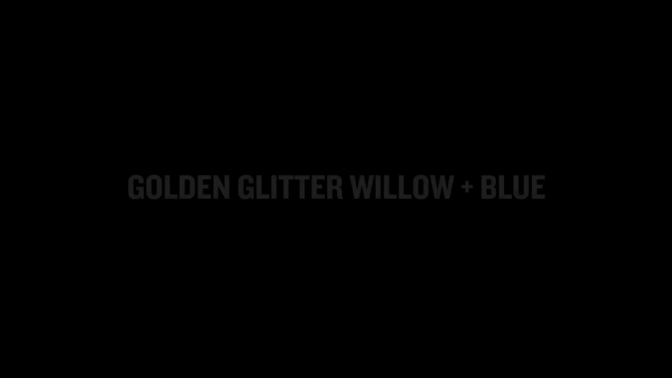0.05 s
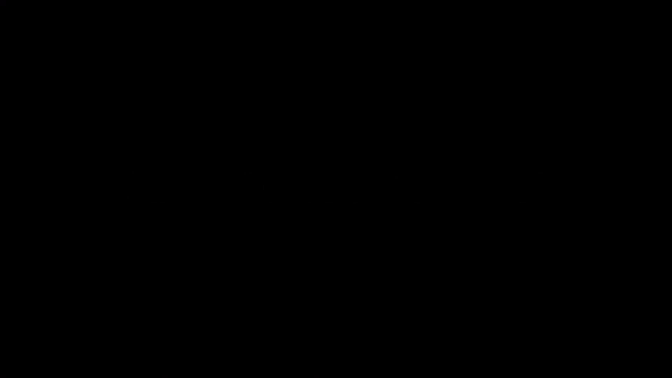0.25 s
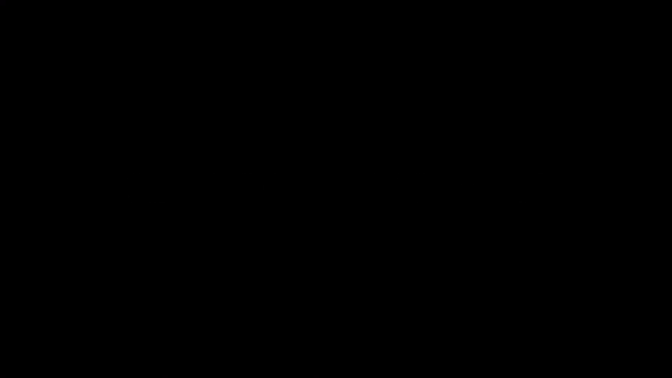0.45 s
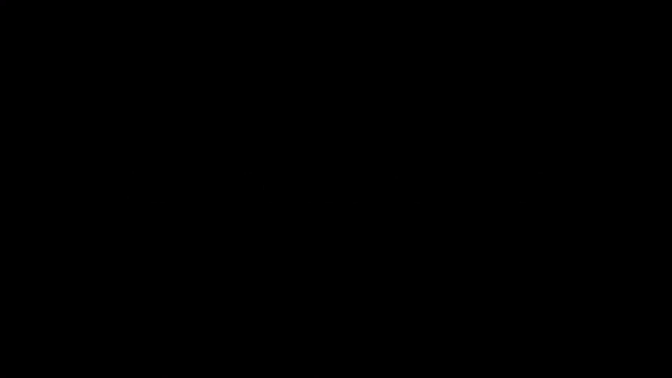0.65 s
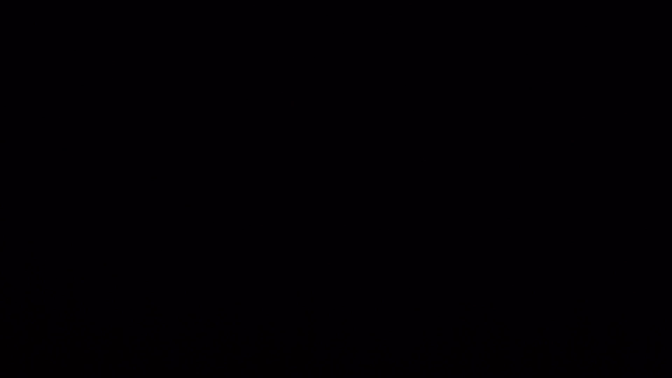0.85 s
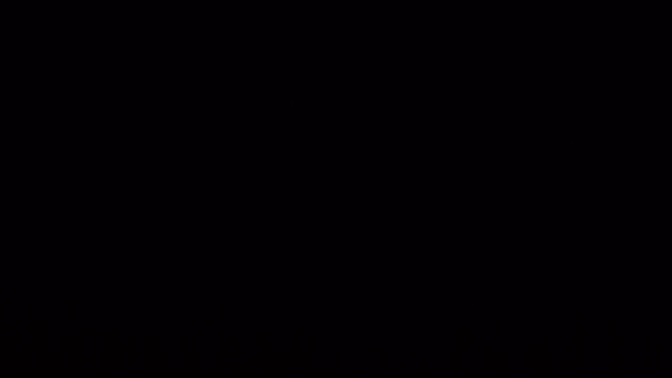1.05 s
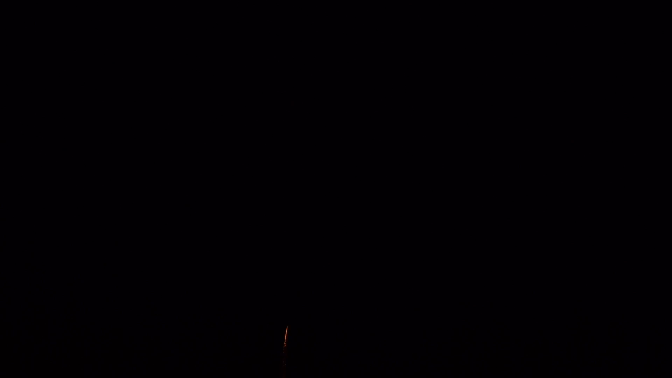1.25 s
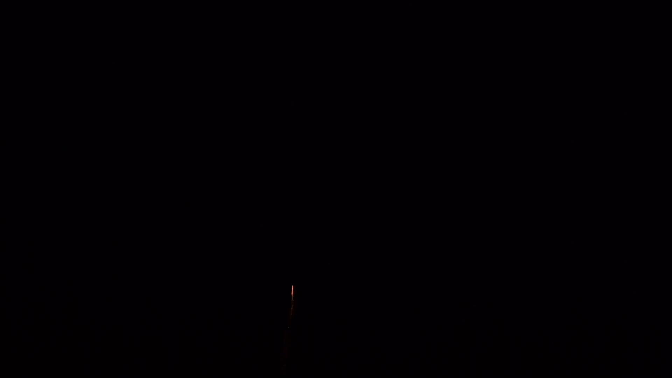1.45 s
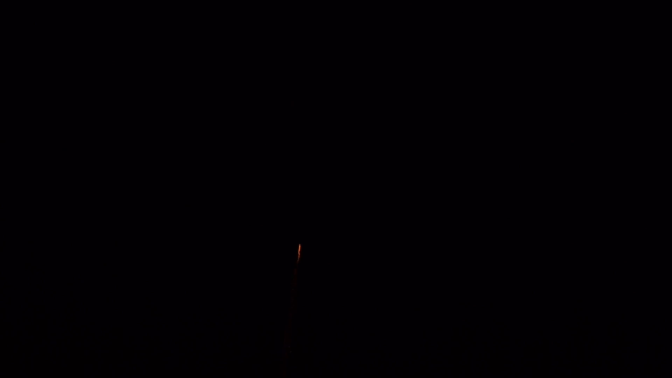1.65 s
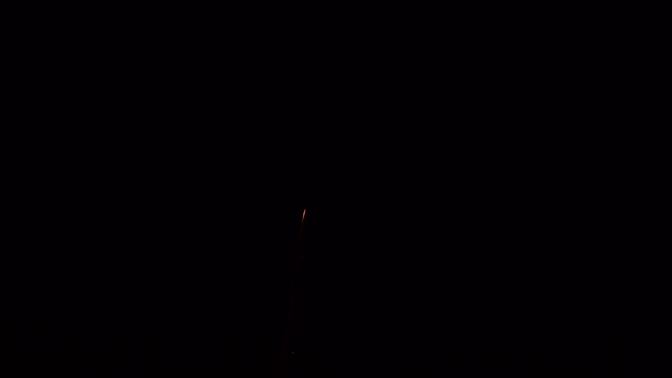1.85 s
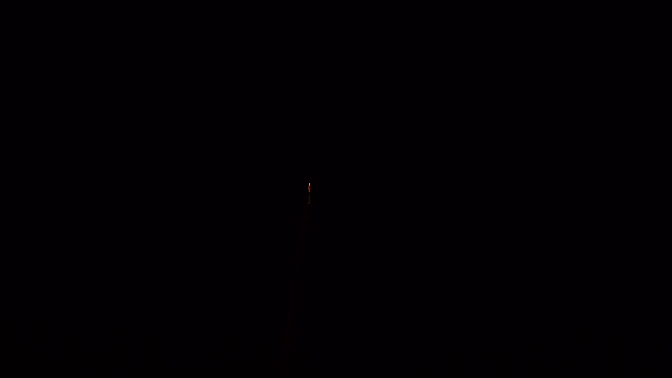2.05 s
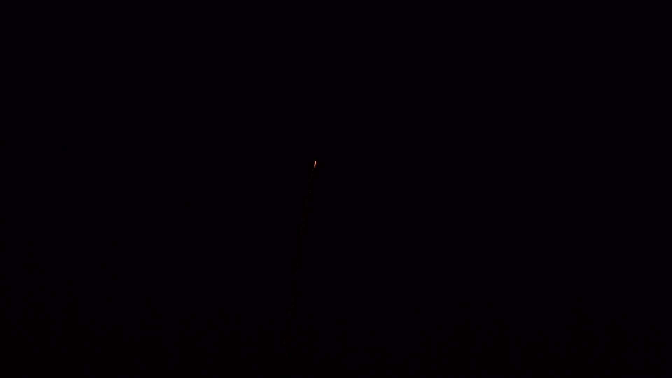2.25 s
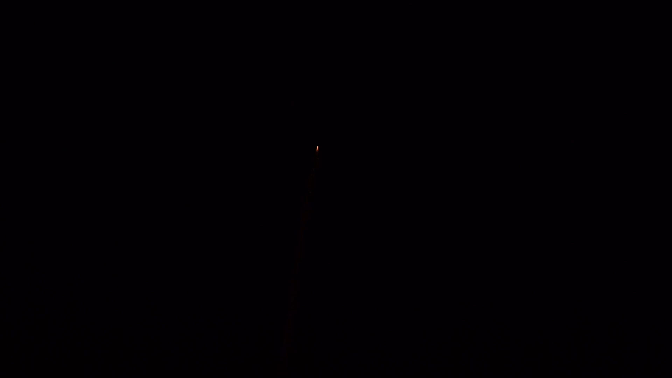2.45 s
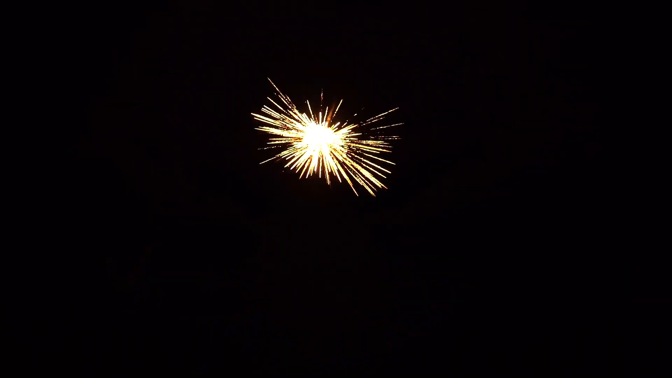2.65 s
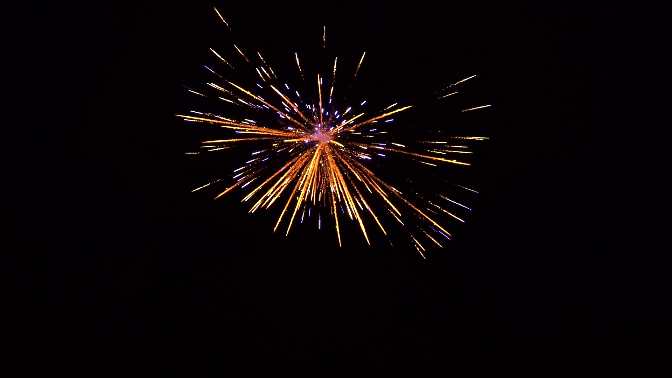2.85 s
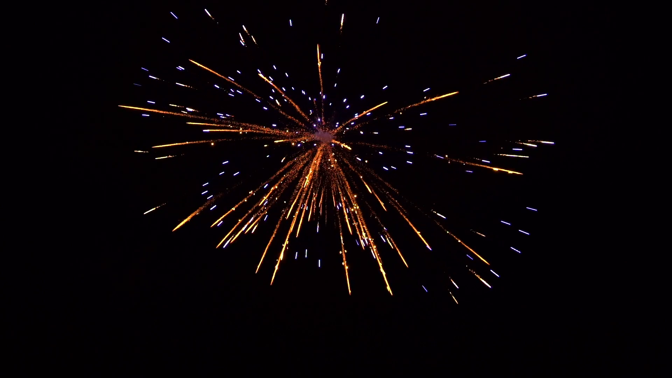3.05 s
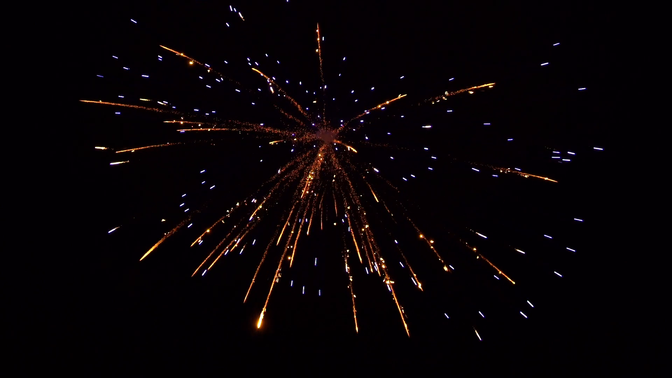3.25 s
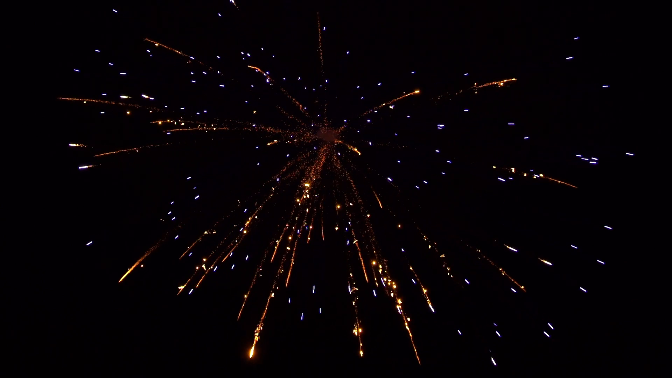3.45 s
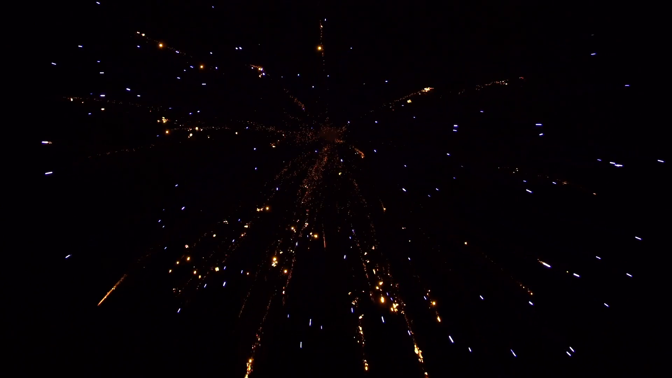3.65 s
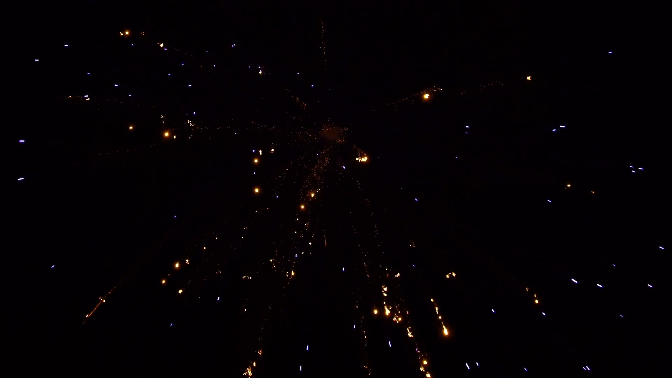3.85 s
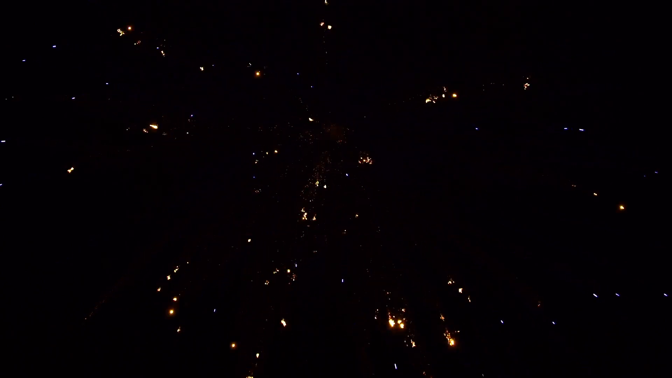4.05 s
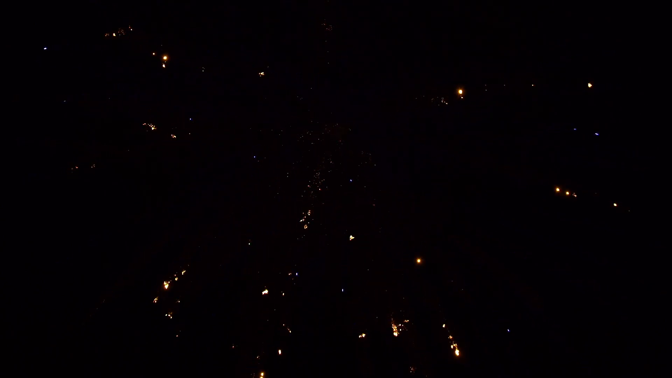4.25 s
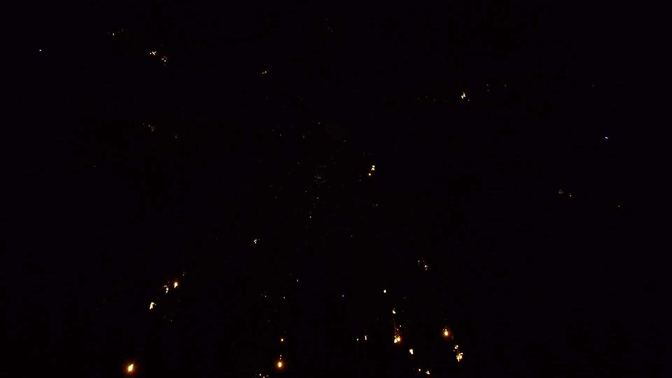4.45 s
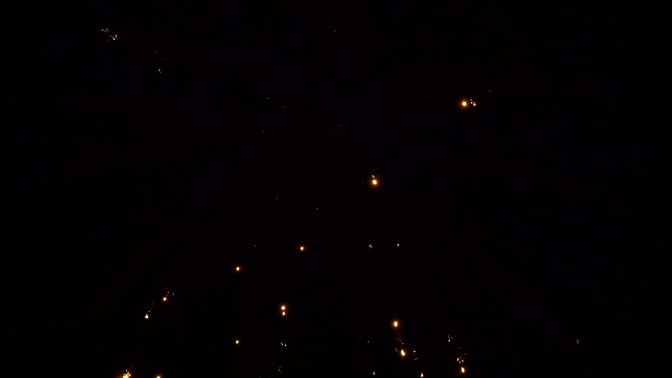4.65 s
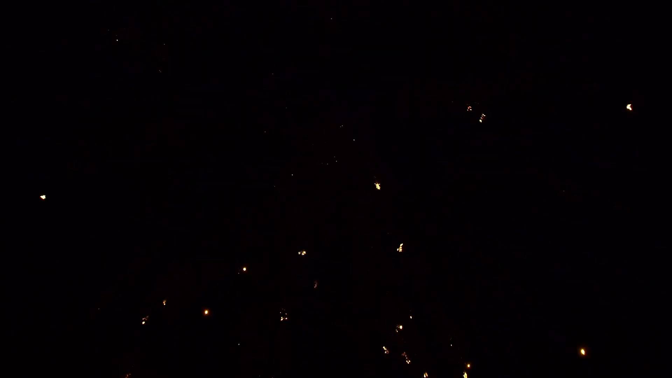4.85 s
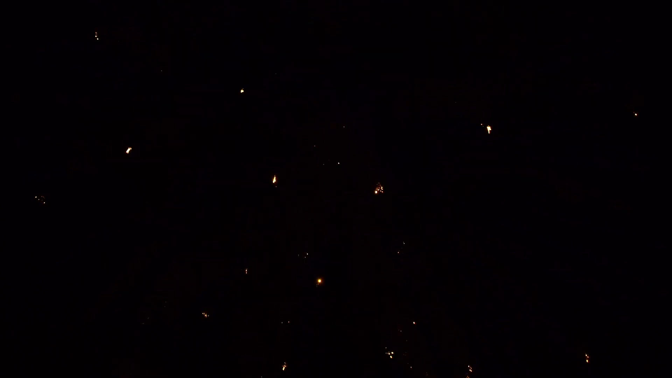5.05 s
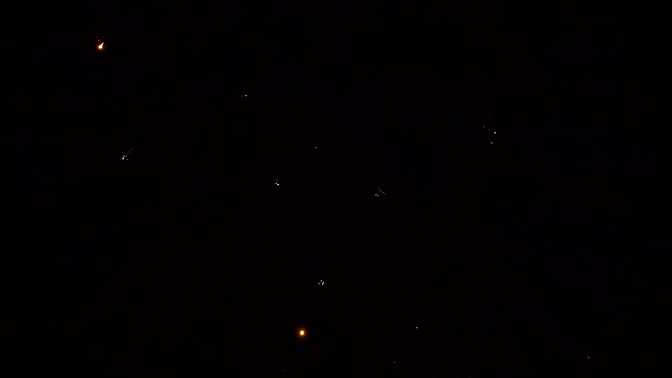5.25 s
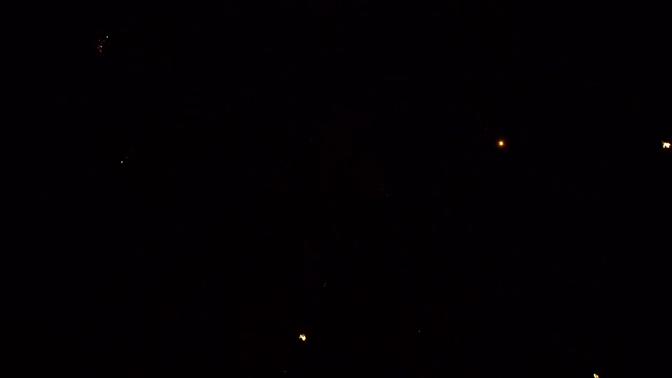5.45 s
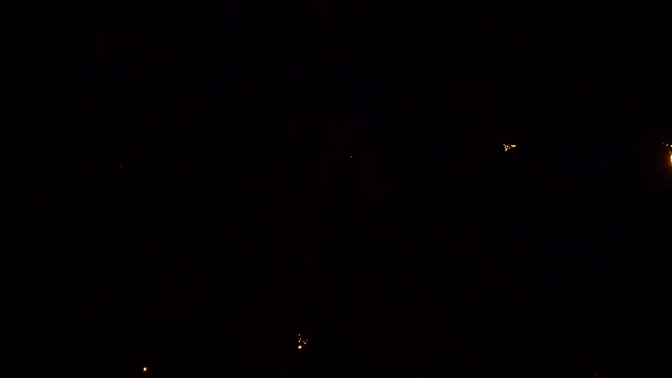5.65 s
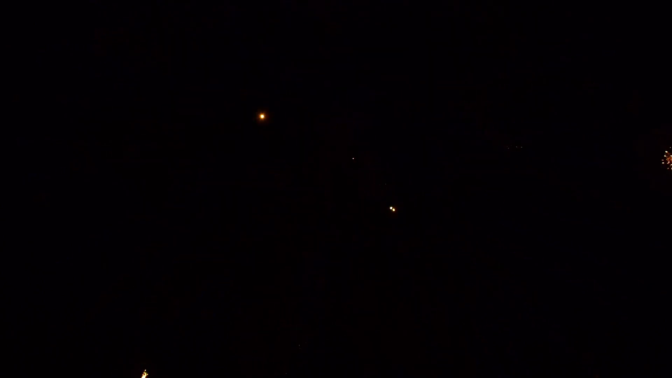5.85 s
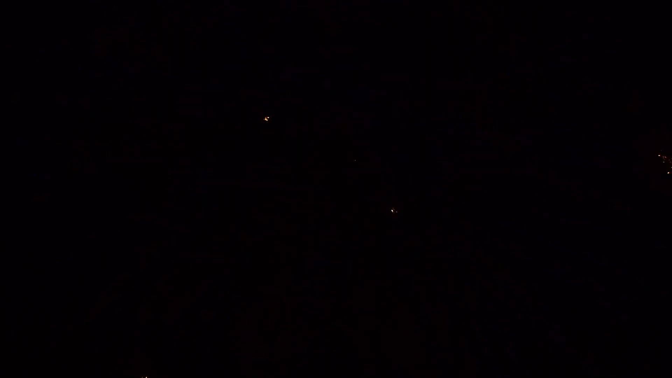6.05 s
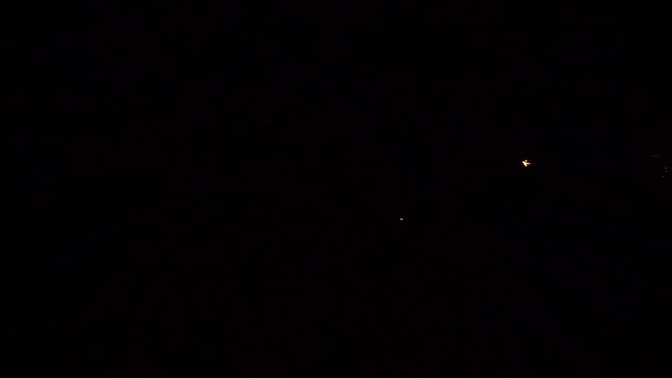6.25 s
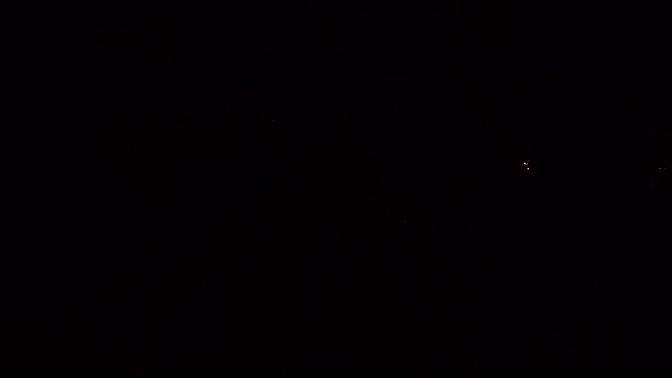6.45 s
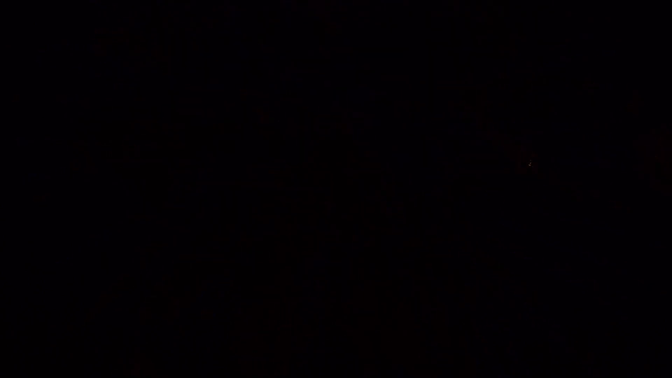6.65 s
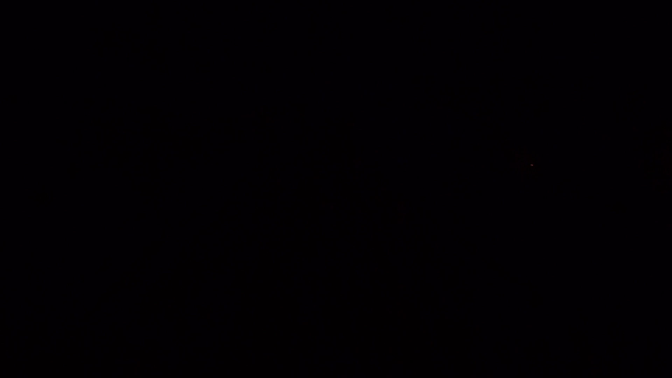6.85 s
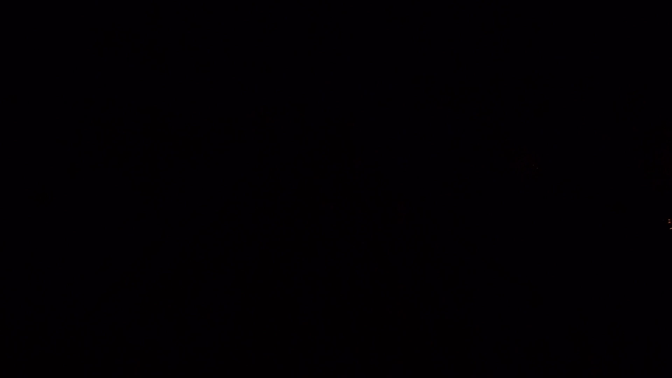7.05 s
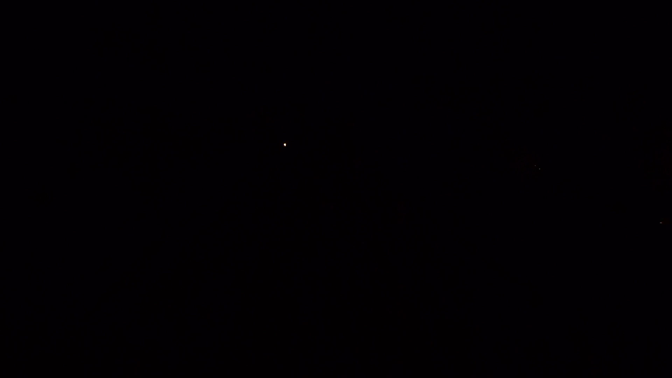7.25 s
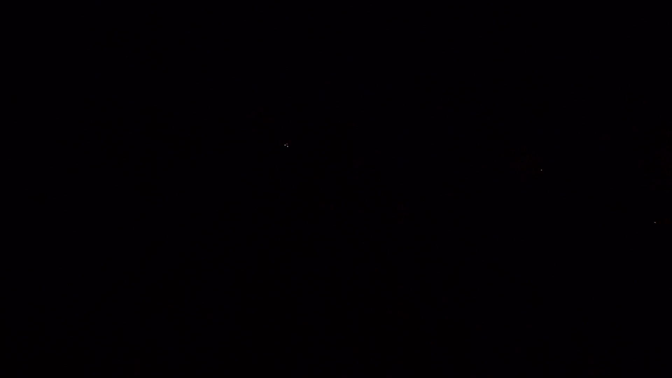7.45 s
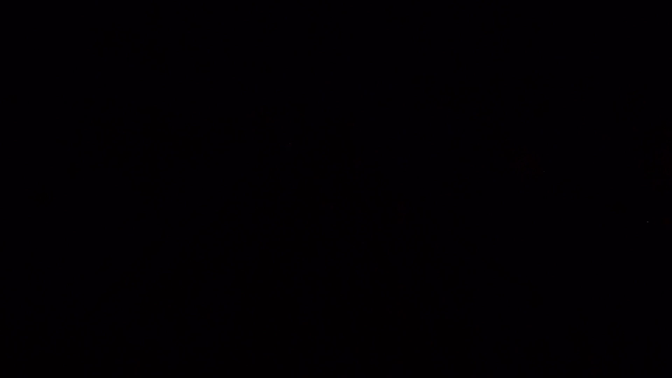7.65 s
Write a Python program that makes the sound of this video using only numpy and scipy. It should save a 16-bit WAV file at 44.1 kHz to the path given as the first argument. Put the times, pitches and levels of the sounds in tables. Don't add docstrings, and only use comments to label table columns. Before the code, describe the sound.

A sharp firework launch and, two seconds later, a hard overhead crack with rumbling echoes, among steady rising whistles of pond frogs.

```python
import sys
import numpy as np
from scipy import signal
from scipy.fft import rfft, irfft, next_fast_len
from scipy.io import wavfile
from scipy.ndimage import uniform_filter1d

SR = 44100
rng = np.random.default_rng(int(sys.argv[2]) if len(sys.argv) > 2 else 0)


def digitize_waveform(pressure):
    field = np.atleast_2d(pressure).T
    bounded = np.clip(field, -1, 1)
    quanta = np.round(bounded * 32767).astype(np.int16)
    wavfile.write(sys.argv[1], SR, quanta)


def gain_from_db(level_db):
    decades = np.asarray(level_db, float) / 20
    return 10 ** decades


N = 340452
SIZE = next_fast_len(N)
T = np.arange(N) / SR
HZ = np.fft.rfftfreq(SIZE, 1 / SR)


def shape(table):
    hz, db = np.transpose(table)
    return np.interp(np.log(HZ + 1), np.log(hz), db)


def band(spectrum, lo_hz, hi_hz):
    lo, hi = np.searchsorted(HZ + 1, [lo_hz, hi_hz])
    across = np.log((HZ[lo:hi] + 1) / lo_hz) / np.log(hi_hz / lo_hz)
    part = np.zeros_like(spectrum)
    part[..., lo:hi] = spectrum[..., lo:hi] * np.sin(np.pi * across) ** 2
    return irfft(part, SIZE)[..., :N]


def walk(rate):
    k = int(SR / rate)
    held = np.repeat(rng.standard_normal(N // k + 1), k)
    return 1.3 * uniform_filter1d(uniform_filter1d(held, k), k)[:N]


def stereo(mid, side):
    # frequency in Hz, side minus mid in dB
    side_db = [(25, -20), (60, -13), (110, -9), (200, -16.5), (700, -15), (2400, -16), (4000, -13),
               (6000, -1.5), (15000, -3)]
    side = side * gain_from_db(shape(side_db))
    return np.array([mid + side, mid - side])


def pan(x, db):
    return x * gain_from_db(np.array([[db / 2], [-db / 2]]))


def night():
    # frequency in Hz, level in dB per Hz
    air_colour = [(20, -25), (60, -4), (140, 3), (260, -20), (500, -18), (1000, -19.5), (1700, -21),
                  (2100, -28), (3500, -33.5), (6000, -43), (11000, -47.5), (11900, -50), (12300, -75),
                  (16000, -80)]
    # time in seconds, level in dB
    hiss_level = [(0, 6), (.5, 7), (.6, -1), (2.85, 4), (3.0, -1), (6, .3), (7.72, 3)]
    # time in seconds, centre in Hz, level in dB, spread in ms
    puffs = [
        (5.82, 5000, -75, 45),
        (6.667, 11500, -78, 4),
    ]
    noise = rfft(rng.standard_normal((2, SIZE)))
    both = stereo(*(noise * gain_from_db(shape(air_colour))))
    hiss_db = np.interp(T, *np.transpose(hiss_level))
    out = np.zeros((2, N))
    for hz in 20 * 2. ** np.arange(11):
        drift_db = 1.5 * walk(3) + hiss_db * (hz > 2000)
        out += gain_from_db(drift_db) * band(both, hz / 2, hz * 2)
    out *= gain_from_db(-60) / out.std() * np.clip(T / .01, 0, 1)
    for s, hz, db, spread_ms in puffs:
        puff = np.exp(-((T - s) * 1000 / spread_ms) ** 2)
        out += gain_from_db(db) * puff * band(noise, hz / 1.9, hz * 1.9)
    return out


def calls():
    # start in seconds, length in seconds, level in dB
    near_frog = (2369, 1530, -4.8), [(.311, .116, -38.5), (1.515, .113, -46), (2.154, .122, -44),
                 (2.804, .107, -39.5), (4.04, .117, -48), (4.845, .118, -47), (5.623, .115, -44),
                 (6.26, .126, -42), (6.972, .115, -40.5), (7.662, .12, -37)]
    big_frog = (2334, 1670, -6.2), [(.487, .092, -40), (1.54, .092, -48), (2.302, .09, -46),
                (3.98, .093, -52.5), (4.704, .09, -50), (5.471, .085, -46), (6.416, .081, -46),
                (7.296, .082, -43.5)]
    high_frog = (2601, 1630, 1), [(1.583, .056, -50), (2.377, .052, -46.5), (3.978, .056, -52),
                 (4.581, .058, -50), (5.688, .058, -47.5), (6.385, .055, -53.5), (7.526, .062, -43.5)]
    quick_frog = (2415, 2150, -4), [(.475, .097, -50), (1.372, .091, -53.5), (2.038, .094, -51.5),
                  (2.686, .091, -50), (3.91, .085, -55), (4.693, .094, -54.5), (5.338, .089, -52.5),
                  (5.857, .097, -51), (6.946, .098, -50), (7.554, .089, -48.5)]
    reed_frog = (2480, 1580, -5), [(.006, .05, -53), (.21, .123, -55), (1.493, .088, -57),
                 (2.24, .117, -56), (4.162, .107, -62), (4.804, .107, -57.5), (5.567, .12, -57),
                 (6.41, .08, -51.5), (7.155, .11, -53.5)]
    far_frog = (2368, 1520, -3.5), [(.022, .097, -46.5), (1.235, .105, -55.5), (1.31, .06, -57),
                (3.771, .094, -56), (4.578, .104, -55.5), (6.245, .03, -50), (6.348, .114, -57.5)]
    long_frog = (2353, 1500, -4.8), [(.529, .131, -43.5), (7.061, .129, -49)]
    stray_frog = (2520, 1630, 1), [(.087, .115, -43)]
    chorus = []
    for voice, rows in [near_frog, high_frog, quick_frog, reed_frog, far_frog, long_frog, stray_frog]:
        chorus += [(*call, *voice, None) for call in rows]
    voice, rows = big_frog
    chorus += [(*call, *voice, 0) for call in rows]
    lead_s, grunt_s, grunt_hz, grunt_db, bright_db = .048, .05, 2262, -12, 9
    for s, _, db in rows:
        chorus.append((s - lead_s, grunt_s, db + grunt_db, grunt_hz, *voice[1:], bright_db))
    return chorus


def peepers():
    # multiple of the whistle, level in dB for small frogs, level in dB for the big frog
    overtones = [(.5, -44, -28), (1.5, -38, -30), (2, -52, -36), (4, -68, -45)]
    out, chorus = np.zeros((2, N + SR)), calls()
    edge_s = .006
    for (s, length, db, hz, rise, pan_db, big), turn in zip(chorus, rng.random(len(chorus))):
        t = np.arange(int((length + 2 * edge_s) * SR)) / SR - edge_s
        u = t / length
        pitch = hz + rise * length * (u + .1 * u * (1 - u))
        phase = 2 * np.pi * (turn + np.cumsum(pitch) / SR)
        voice = np.sin(phase)
        for k, small_db, big_db in overtones:
            voice += gain_from_db(small_db if big is None else big_db + big) * np.sin(k * phase)
        ramp = np.minimum(t + edge_s, (length + edge_s - t) * .6) / .011
        swell = np.sin(np.pi / 2 * np.clip(ramp, 0, 1)) ** 2
        swell *= gain_from_db(3.0 * np.sin(np.pi * np.clip(u, 0, 1)) - 2)
        i = max(int((s - edge_s) * SR), 0)
        out[:, i:i + len(t)] += pan(np.sqrt(2) * gain_from_db(db) * swell * voice, pan_db)
    out = out[:, :N]
    age = T[:SR]
    decay = gain_from_db(-60 * age / .75) + gain_from_db(-4.5 - 60 * age / 2.5)
    trees = rng.standard_normal((3, SR)) * decay * np.clip(age / .02, 0, 1)
    trees = gain_from_db(-47) * (trees[0] + .3 * trees[1:])
    return out + signal.fftconvolve(out.mean(0, keepdims=True), trees, axes=1)[:, :N]


def tearing_gas():
    # start in seconds, peak in seconds, level in dB, fade in ms, centre in Hz
    tears = [(.529, .537, -31.5, 7.0, 5900), (2.9156, 2.9162, -38, 25.0, 5500), (.54, .542, -28, 6.0, 700),
             (.586, .595, -37, 5.0, 5000), (.615, .629, -36, 12.0, 5000), (.553, .556, -47, 20.0, 6000),
             (2.917, 2.921, -25, 14.0, 600), (2.945, 2.97, -37, 40.0, 4500), (2.918, 2.923, -31, 6.0, 1500),
             (.55, .565, -38, 30.0, 330), (.595, .61, -35, 30.0, 320)]
    gas = rfft(rng.standard_normal((3, SIZE)))
    gas = gas[0] + .65 * gas[1:]
    out = np.zeros((2, N))
    for k, (start, peak, db, fade_ms, hz) in enumerate(tears):
        hiss = np.roll(band(gas, hz / 3.5, hz * 3.5), -k * 9000, axis=1) * np.sqrt(SR / 3 / hz)
        swell = np.clip((T - start) / (peak - start), 0, 1) ** 1.5
        fade = np.exp(-np.clip(T - peak, 0, 1) * 1000 / fade_ms)
        out += gain_from_db(db) * swell * fade * hiss
    return out


def shock_fronts():
    # time in seconds, peak in dB, push in ms, left minus right in dB
    shocks = [
        (.5331, -23, .9, -1.5),
        (.5396, -7.5, .8, 2),
        (2.9156, -7.5, .8, 0),
        (2.9165, -6.5, .55, 1),
        (2.9203, -18, 5.5, 0),
    ]
    out = np.zeros((2, N))
    for s, db, push_ms, pan_db in shocks:
        u = (T - s) * 1000 / push_ms
        rise = np.clip(u / .2, 0, 1)
        drop = np.clip((1 - u) / .3, -.35, 1)
        recovery = np.exp(-np.clip(u - 1, 0, 50) ** 2 / 1.5)
        out += pan(gain_from_db(db) * rise * drop * recovery, pan_db)
    return out


def mortar_tube():
    # start in seconds, end in seconds, pitch in Hz, level in dB
    tube = (.5361, .5396, 555, -13)
    start, end, hz, db = tube
    gate = np.clip(np.minimum(T - start, end - T) / .0003, 0, 1)
    return gain_from_db(db) * np.cos(2 * np.pi * hz * (T - end) + 2.1) * gate


def gas_swing():
    # start in seconds, trough in seconds, pitch in Hz, peak in dB, fade in ms, pressure left behind
    thumps = [
        (.5411, .5436, 106, -5.5, 9.7, .13),
        (2.917, 2.9189, 122, -4.5, 9.0, -.2),
    ]
    late_s = np.array([[.00015], [0]])
    out = np.zeros((2, N))
    for start, trough, hz, db, fade_ms, behind in thumps:
        age = np.clip(T - start, 0, 1)
        u = age * 1000 / fade_ms
        swing = -np.cos(2 * np.pi * hz * (T - late_s - trough) * (1 - 6.0 * age.clip(0, .04)))
        out += gain_from_db(db) * swing * np.clip(age / .0012, 0, 1) * np.exp(-u ** 3)
        out += behind * np.clip(u, 0, 1) ** 6 * np.exp(-age / .016)
    return out


def slope_slaps():
    # time in seconds, peak in dB, pitch in Hz
    slaps = [(.599, -19, 88), (.634, -27, 110), (.741, -27, 140), (.866, -28, 120), (.934, -25, 113),
             (1.002, -27, 129), (1.086, -31, 125), (1.209, -33, 95), (1.549, -38, 102), (3.04, -25, 172),
             (3.084, -21, 180), (3.142, -28, 170), (3.279, -27, 180)]
    out = np.zeros(N)
    for s, db, hz in slaps:
        u = (T - s) * hz - 1.1
        out += gain_from_db(db + 2) * np.sin(2 * np.pi * u) * np.exp(-(u / .7) ** 2)
    return out


def roar(start_s, length_s, field, lean, colour, knocks_db, patchy_db, early_s, swell_db, swell_s, far_db_per_s):
    centres_hz = (75, 200, 750, 3700)
    # low edge in Hz, high edge in Hz
    edges_hz = [(40, 110), (140, 350), (450, 1300), (3000, 4500)]
    knee_s = .08
    air_loss = 25
    wide_db, wide_s = 13, .13
    knock_rate = 70
    age = np.arange(0, length_s, .005)
    s, pan_db = start_s + age, np.interp(age, *np.transpose(lean))
    levels = []
    for db, hold, fade, far_db in field:
        near_db = db - fade * knee_s * np.logaddexp(0, (age - hold) / knee_s)
        hills_db = far_db - far_db_per_s * age
        total_db = 10 * np.log10(gain_from_db(2 * near_db) + gain_from_db(2 * hills_db))
        levels.append(total_db - swell_db * np.clip(1 - age / swell_s, 0, 1))

    chance = rng.random((2, 2, N))
    hits = (chance[0] < knock_rate / SR) * np.sign(chance[1] - .5)
    knocks = hits * chance[0, ::-1] * np.sqrt(3 * SR / knock_rate)
    haze = rfft(rng.standard_normal((2, SIZE)))
    echoes = haze + gain_from_db(knocks_db) * rfft(knocks, SIZE) / (1 + (HZ / 450) ** 2)
    echoes *= gain_from_db(shape(colour))
    power = np.abs(echoes[0]) ** 2 * 2 / SIZE ** 2
    gains = []
    for db, (lo, hi) in zip(levels, edges_hz):
        gains.append(db - 10 * np.log10(power[(HZ > lo) & (HZ < hi)].sum()))

    both, out = stereo(*echoes), np.zeros((2, N))
    surge = .7 * walk(30)
    here = (s * SR).astype(int).clip(0, N - 1)
    for centre in 20 * 2 ** np.arange(0, 10, .5):
        db = np.zeros(len(age))
        for share, g in zip(np.eye(len(gains)), gains):
            db += np.interp(np.log(centre), np.log(centres_hz), share) * g
        above = max(centre / centres_hz[-1] - 1, 0) ** 1.2
        db -= air_loss * above * (age - early_s * min(6000 / centre, 1) ** 1.5)
        db += patchy_db * (walk(14) + surge)[here]
        lean_db = pan_db / (1 + centre / 600)
        gain = [np.interp(T, s, gain_from_db(db + side * lean_db / 2)) for side in (1, -1)]
        left, right = band(both, centre / np.sqrt(2), centre * np.sqrt(2))
        spread_db = (wide_db * np.exp(-age / wide_s) - 4.5) / (1 + (centre / 1800) ** 2)
        wide = np.interp(T, s, gain_from_db(spread_db))
        differing = wide * (left - right) * np.array([[1], [-1]])
        out += gain * (left + right + differing) / 2
    fade_in = np.clip((T - s[0] + .022) / .018, 0, 1)
    fade_out = np.clip((s[-1] + .2 - T) / .05, 0, 1)
    return out * fade_in * fade_out


def lift_roar():
    # full level in dB, held until age in seconds,
    # then fade in dB a second, far hills' level in dB
    echo_field = [
        (-36.5, .15, 9.5, -75),
        (-35, .27, 23, -59),
        (-37.5, .14, 15, -85),
        (-40.5, .2, 31, -90),
    ]
    # age in seconds, left minus right in dB
    echo_lean = [(0, 0), (.25, 4.5), (1.2, 6.5), (2.3, 4.5)]
    # frequency in Hz, level in dB per Hz
    echo_colour = [(15, -49), (25, -30), (68, -1.5), (120, -1), (363, -18.5), (427, -15.5), (531, -22),
                   (624, -15.5), (775, -12), (1400, -18), (2480, -21), (4140, -25), (6920, -42.5),
                   (10700, -49.5), (16000, -68.5)]
    return roar(.575, 2.25, echo_field, echo_lean, echo_colour, knocks_db=0, patchy_db=.8,
                early_s=.41, swell_db=8, swell_s=.065, far_db_per_s=4)


def burst_roar():
    # full level in dB, held until age in seconds,
    # then fade in dB a second, far hills' level in dB
    echo_field = [
        (-42.5, .85, 9, -56),
        (-32, .33, 19, -45),
        (-38.5, .55, 11.5, -54),
        (-43, .3, 25.5, -83),
    ]
    # age in seconds, left minus right in dB
    echo_lean = [(0, 0), (.55, 2.5), (1.15, 7), (1.6, 4), (2.8, 2), (4.7, 2.5)]
    # frequency in Hz, level in dB per Hz
    echo_colour = [(15, -57), (25, -28), (80, -2.5), (190, 0.5), (263, -3), (451, -10.5), (575, -7),
                   (677, -11.5), (1020, -10.5), (1100, -13), (1370, -13.5), (1520, -16.5), (4250, -26.5),
                   (9840, -43.5), (16000, -59)]
    return roar(2.95, 4.7, echo_field, echo_lean, echo_colour, knocks_db=-2.5, patchy_db=.7,
                early_s=.2, swell_db=1.5, swell_s=.07, far_db_per_s=2.5)


def tree_frog():
    # time in seconds, pulses a second, level in dB
    trill = [(5.9, 14.6, -92), (6.45, 14.0, -82), (7.0, 14.05, -76), (7.72, 14.1, -72)]
    s, rate, db = np.transpose(trill)
    pulses_left = np.cumsum(np.interp(T[::-1], s, rate))[::-1] / SR
    age = -((pulses_left + .2) % 1 - .5) / 14
    blip = np.exp(-(age / .0075) ** 2) * np.sin(2 * np.pi * (1540 * age + 6500 * age ** 2))
    return pan(gain_from_db(np.interp(T, s, db, left=-120) + 13) * blip, -6)


def scene():
    blasts = tearing_gas() + shock_fronts() + mortar_tube() + gas_swing() + slope_slaps()
    return night() + peepers() + blasts + lift_roar() + burst_roar() + tree_frog()


def band_limit(x):
    return signal.sosfilt(signal.butter(12, 16300, fs=SR, output="sos"), x)


def record(dry):
    mix = signal.sosfilt(signal.butter(8, 15000, fs=SR, output="sos"), dry)
    return band_limit(mix)


dry = scene()
out = record(dry)
digitize_waveform(out)
```